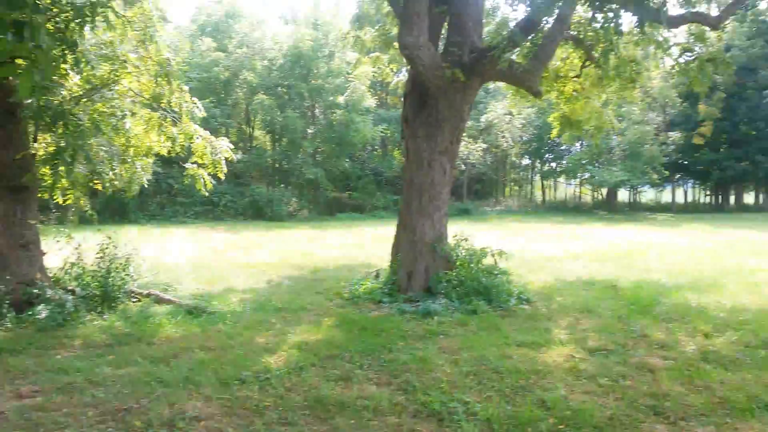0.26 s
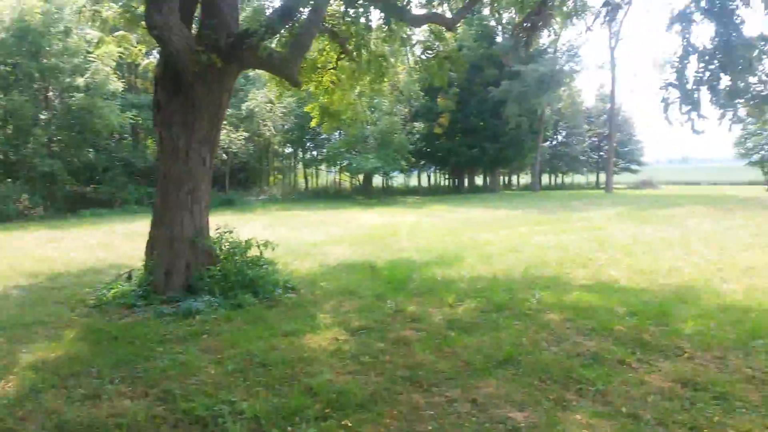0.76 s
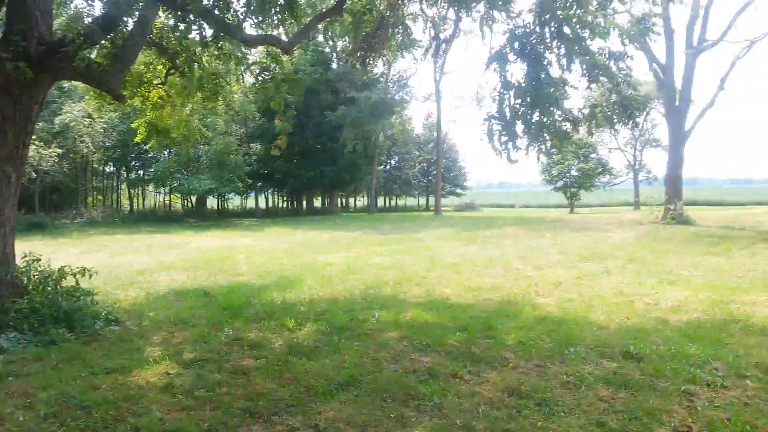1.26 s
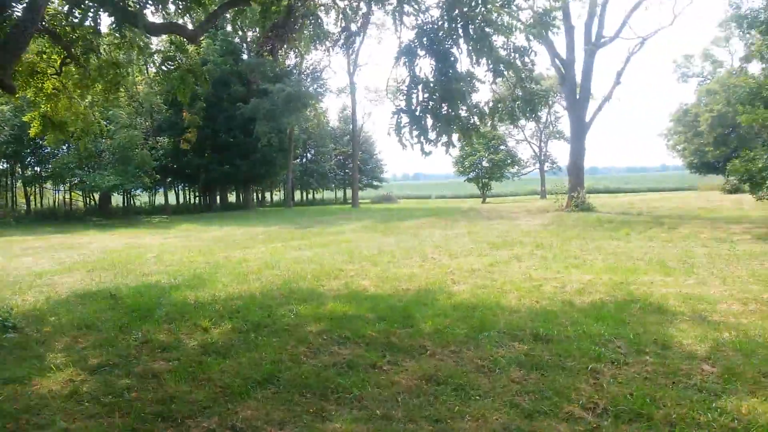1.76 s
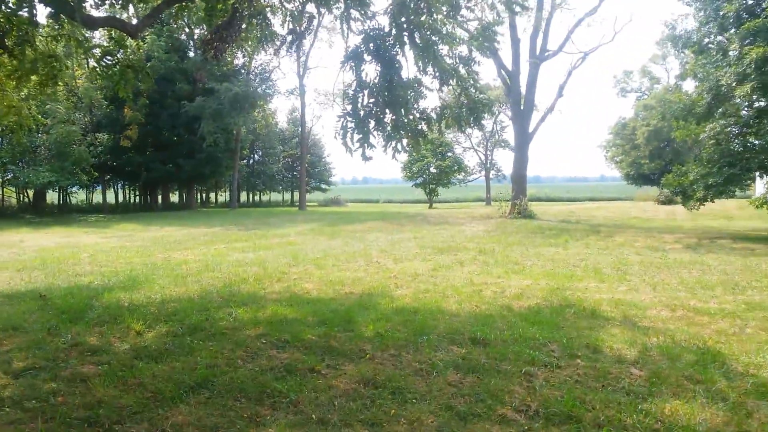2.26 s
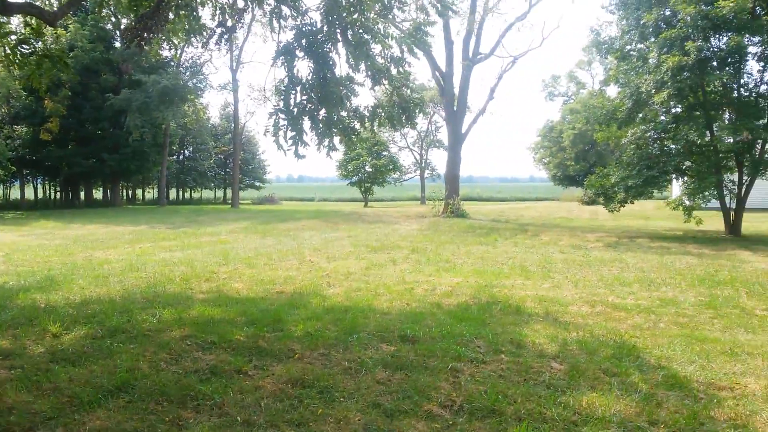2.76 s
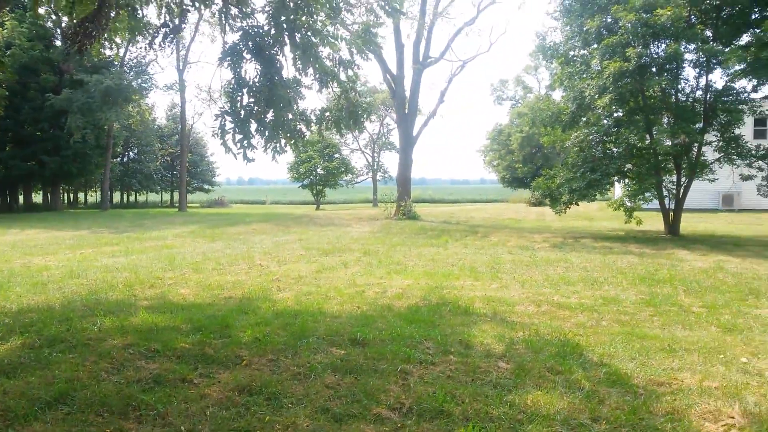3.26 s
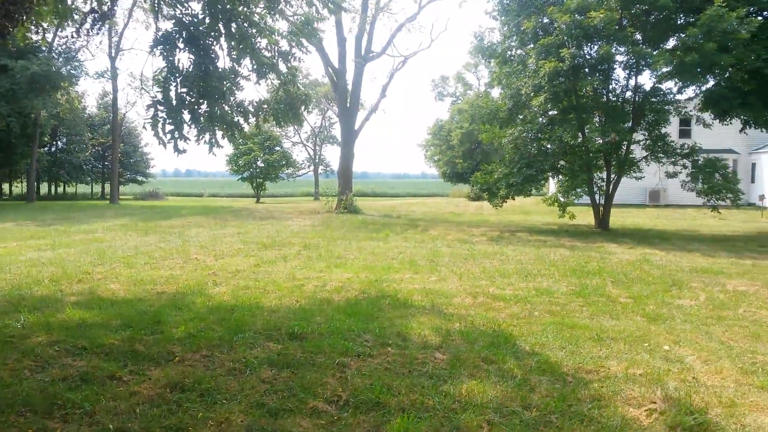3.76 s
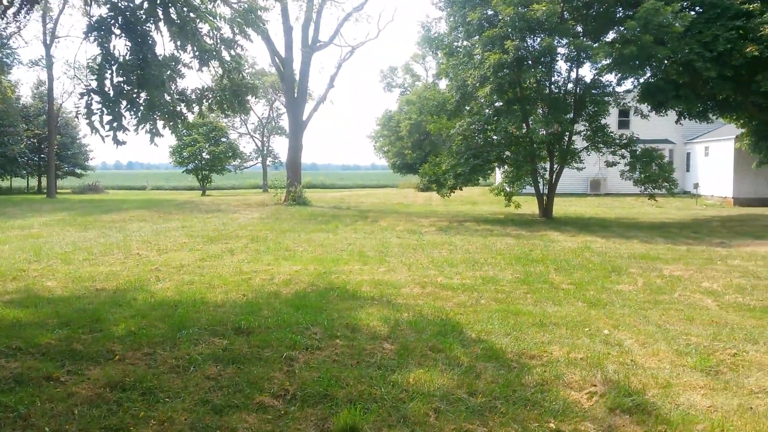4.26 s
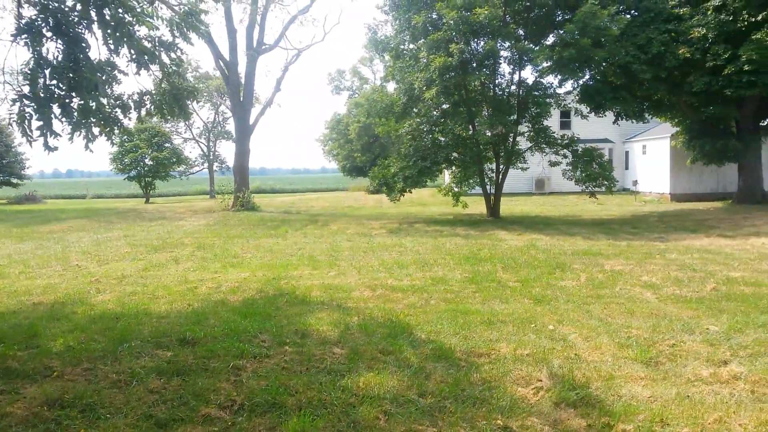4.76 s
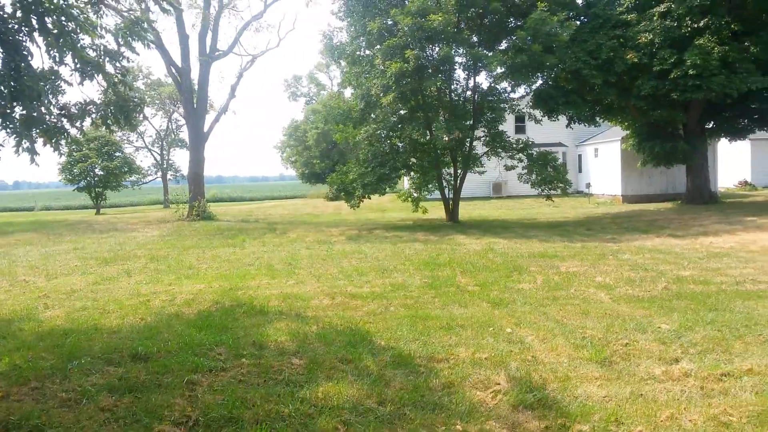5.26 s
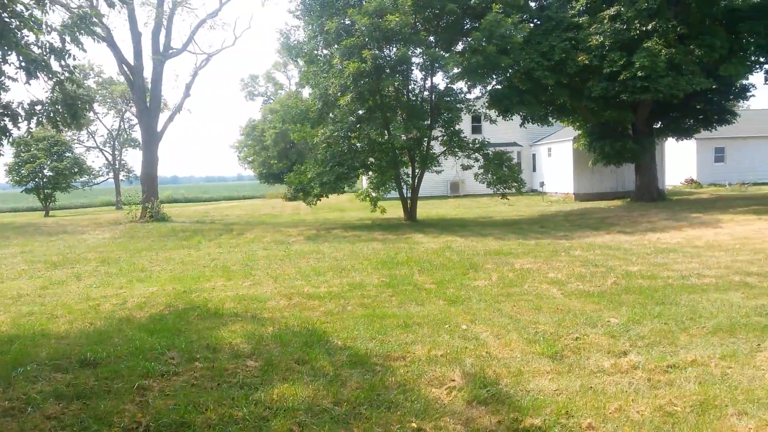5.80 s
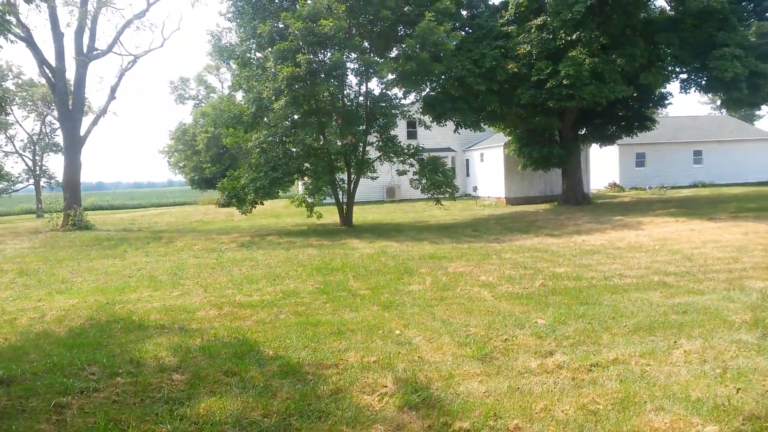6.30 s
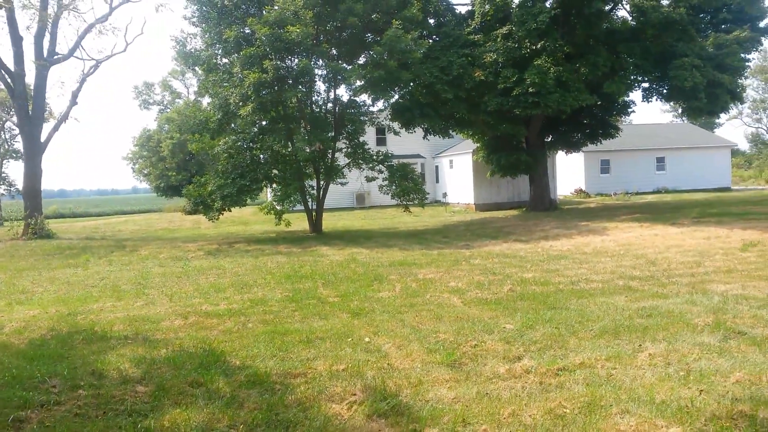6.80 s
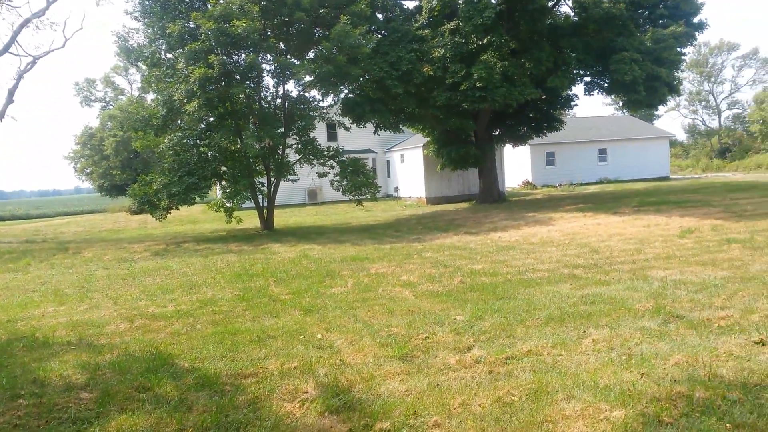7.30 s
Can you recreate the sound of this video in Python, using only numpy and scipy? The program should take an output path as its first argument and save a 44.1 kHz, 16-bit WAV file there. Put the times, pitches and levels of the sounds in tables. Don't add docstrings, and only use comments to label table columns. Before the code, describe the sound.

Insects trill shrilly and steadily among trees, with lower cricket chirps, katydid ticks, buffeting wind that calms, and a few thin bird whistles late.

```python
import sys
import numpy as np
from scipy import signal
from scipy.fft import rfft, irfft, next_fast_len
from scipy.io import wavfile
from scipy.ndimage import uniform_filter1d

SR = 44100
rng = np.random.default_rng(int(sys.argv[2]) if len(sys.argv) > 2 else 0)


def magnitude_from_level(level_db):
    exponent = np.asarray(level_db, float) / 20
    return 10 ** exponent


def transcribe(signal):
    frames = np.atleast_2d(signal).T
    limited = np.clip(frames, -1, 1)
    pcm = np.round(limited * 32767).astype(np.int16)
    wavfile.write(sys.argv[1], SR, pcm)


N = 332514
T = np.arange(N) / SR
COARSE_T = T[::8]
MID_HZ = 8200

# pitch in Hz, left and right level in dB.
AIR = [(91, -9.5, -9.5), (417, -22, -22), (990, -21, -21.5), (2100, -21.5, -22), (2860, -23, -27),
       (4025, -23, -25), (4750, -14.5, -17.5), (5190, -19, -14), (5270, -16, -32), (6160, -23.5, -15),
       (6880, -10.5, -20.5), (9300, -20.5, -22.5), (12200, -23, -18.5), (14330, -19, -15),
       (16100, -17, -13)]
# pitch in Hz, left level in dB, right level in dB.
LEAVES = [(300, 4.5, 0), (1010, -11, -12), (2200, -9, -11), (2900, -18, -30), (3500, -7, -24),
          (4300, -9, -27), (5100, -3, -13), (6000, -11, -13), (9900, -28, -10), (14500, -20, -7)]
# time in seconds, level in dB.
RUSTLE = [(0, -46), (.3, -41.5), (.44, -37), (.5, -37), (.72, -36), (.85, -37), (.9, -41), (1.1, -49),
          (1.35, -58), (1.5, -41), (2.4, -45.5), (2.9, -53), (3.6, -74.5), (7.54, -50.5)]
# time in seconds, pitch in Hz, level in dB.
HUM = [
    (0, 155.6, -83),
    (2.8, 156.5, -60),
    (3.9, 157.4, -63.5),
    (4.6, 156, -62),
    (4.75, 158.2, -50),
    (5.2, 156.4, -51),
    (5.9, 155.3, -54.5),
    (6.4, 154.7, -61),
    (7.54, 154, -63),
]
# start in seconds, length in seconds, start pitch in Hz, end pitch in Hz, level in dB.
BIRD = [
    (5.682, .075, 9950, 9150, -42),
    (5.81, .065, 10150, 9250, -43),
    (5.922, .058, 10000, 9350, -39),
    (6.035, .06, 10050, 9200, -41),
    (7.125, .07, 11620, 11130, -51),
    (7.2, .24, 11100, 10470, -48),
]
# time in seconds, peak level in dB, left minus right in dB.
CHIRPS = [(0.1431, -56, -5), (0.1815, -64, -3), (1.2784, -50, -3), (1.3134, -50, 7), (1.5314, -58, 1),
          (1.5728, -47, 2.0), (1.7664, -47, 1.0), (1.8053, -50, 3.0), (2.0183, -48, 6.0),
          (2.0557, -45, 5.0), (2.0887, -44, -4), (2.2224, -43, -1.0), (2.2643, -45, -4), (2.5446, -42, -6),
          (2.579, -41, -2.0), (2.7187, -50, -2), (2.7644, -44, 4.0), (2.798, -43, 3.0),
          (2.8345, -40.5, 0.5), (3.0584, -44, 3.5), (3.0914, -42, 3), (3.1244, -51, 1.5), (3.1707, -50, 3),
          (3.1944, -53, 5.0), (4.0537, -49, 1.5), (4.0996, -51, 2.5), (4.4593, -46, -2), (4.5027, -47, -3),
          (5.4715, -45, 1.5), (5.5967, -41, 0.5), (5.6331, -39.5, 1.0), (5.8616, -42.5, -1),
          (5.894, -42, 0.5), (6.134, -42, 3.0), (6.1664, -41, -6), (6.4657, -47, 6), (6.4961, -48, 0.5),
          (6.8434, -50, 2), (6.8902, -45, 1), (7.1367, -52, 6), (7.1726, -51, 0)]
# time in seconds, peak level in dB, left minus right in dB.
FAR_CHIRPS = [
    (5.405, -50, 2),
    (5.57, -48, 0),
    (5.83, -48, 0),
    (6.1, -53, 0),
    (6.21, -53, 2),
]
# start in seconds, end in seconds, strokes per second, left and right level in dB.
BUZZES = [
    (1.36, 2.9, 170, -55, -48),
    (4.0, 4.75, 56.5, -55, -56),
    (.42, .85, 170, -50, -47),
]
# time in seconds, peak level in dB, left minus right in dB.
TICKS = [(.454, -31, -3), (.468, -31, -3), (.473, -29, -6), (.479, -28, -4), (.493, -25, -3),
         (.503, -28, -3), (.51, -29, -3), (.572, -27, -4), (.705, -29, -5), (.527, -27, 0), (.55, -30, -4),
         (.607, -20, -5), (.672, -30, -6), (.693, -25, -4), (.712, -27, -4), (3.856, -38, 3),
         (3.92, -37, 3), (3.985, -38, 3), (5.889, -38, 0)]
# time in seconds, peak level in dB, centre pitch in Hz, left minus right in dB, top pitch in Hz.
CLICKS = [(0.33, -32, 1890, 2, 6040), (0.4156, -43, 1020, 20, 4000), (0.4217, -28.5, 1650, 17.5, 3470),
          (0.455, -49, 1110, -2, 6000), (0.6626, -26, 2740, 5, 3500), (0.6809, -13.5, 2100, 1, 7940),
          (0.7342, -26.5, 2140, -10, 3500), (1.334, -40, 1560, 8, 4000), (1.394, -19.5, 1530, 4, 3800),
          (4.0172, -38, 1740, 17, 5000), (4.0255, -28, 2020, 1, 3200), (4.0551, -33, 1230, 16, 2800),
          (5.3286, -39.5, 3640, -4.5, 5000)]
# time in seconds, left level in dB, right level in dB.
BREEZE = [
    (0, -22, -25.5),
    (.8, -35, -31.5),
    (1.1, -78, -39),
    (2.3, -45, -43.5),
    (2.7, -49, -65),
    (4.5, -46, -47),
    (6, -60, -53),
    (7.54, -61, -70),
]
# middle in seconds, length in seconds, left level in dB, right level in dB.
GUSTS = [(0.03, 0.26, -23.5, -41), (0.192, 0.11, -20, -22.5), (0.493, 0.12, -15.5, -11.5),
         (0.864, 0.2, -37, -22.5), (1.277, 0.25, -47, -22), (1.51, 0.17, -58, -27.5),
         (1.797, 0.17, -55, -29.5), (2.152, 0.3, -66, -31.5), (2.33, 0.17, -40, -30),
         (2.73, 0.15, -51, -38), (3.138, 0.086, -42, -33.5), (3.378, 0.12, -47, -28.5),
         (3.534, 0.16, -35, -32), (3.903, 0.31, -62, -40), (4.28, 0.06, -40.5, -32.5),
         (4.52, 0.13, -33, -41), (4.935, 0.23, -58, -40.5), (5.313, 0.48, -60, -43.5),
         (5.78, 0.1, -68.5, -42.5), (6.346, 0.26, -48.5, -50), (6.784, 0.21, -49, -51),
         (7.428, 0.13, -66, -46)]
# pitch in Hz, level in dB.
BUFFET = [(20, 2), (45, -7), (80, 12), (130, 9), (220, -1.5), (350, -17), (550, -30), (1200, -38)]
# time in seconds, level in dB, pitch in Hz.
EDDIES_LEFT = [(.202, -16.5, 185), (.231, -12.5, 224), (.464, -17, 203), (.548, -15, 161), (.605, -22, 122),
               (.784, -16.5, 200), (.83, -9, 175), (1.085, -34, 127), (1.212, -18.5, 139),
               (2.051, -25, 120), (2.325, -40, 110), (2.897, -37, 101), (3.343, -35, 189),
               (3.523, -20.5, 201), (3.559, -41, 90.5), (3.631, -26.5, 130), (3.702, -34.5, 99),
               (3.948, -23, 107), (4.223, -36, 109), (4.286, -24, 112), (4.519, -30, 116),
               (4.566, -37, 105), (4.836, -39, 122), (5.15, -47, 117), (5.498, -27.5, 184),
               (5.701, -40, 116), (6.18, -38.5, 93), (6.395, -42, 142), (6.869, -33.5, 114),
               (7.45, -37.5, 112.1)]
# time in seconds, level in dB, pitch in Hz.
EDDIES_RIGHT = [(0.279, -13.5, 178), (0.511, -9.5, 273), (0.542, -11.5, 162), (0.859, -14, 166),
                (1.008, -15.5, 157), (1.139, -15.5, 116), (1.189, -9.5, 153), (1.243, -12, 132),
                (1.302, -14.5, 143), (1.452, -17, 154), (1.604, -13, 147), (1.782, -13, 165),
                (1.855, -15, 156), (2.073, -11.5, 164), (2.113, -13.5, 174), (2.186, -15, 126),
                (2.347, -18, 188), (2.712, -27, 107), (2.93, -26, 110), (3.089, -28, 142),
                (3.175, -22, 159), (3.376, -19.5, 130), (3.457, -22, 126), (4.488, -25, 154),
                (4.949, -20, 165), (5.195, -21, 142), (5.743, -36, 95.5), (5.986, -40, 113),
                (6.14, -34.5, 132), (6.754, -36.5, 113)]
# pitch in Hz, left level in dB, right level in dB.
SINGERS = [(6550, -34, -28), (7000, -13.5, -18.5), (7393, -2, -5), (7540, -4.5, -2), (7940, -5, 1.5),
           (8640, -9, -1.5), (8980, -13.5, -8.5), (8920, -26, -24), (9550, -24, -24)]
# time in seconds, level in dB, left minus right in dB.
CHORUS = [(0.0, -33.5, 0.5), (1.11, -33, -1.5), (1.19, -35, -2), (3.0, -34, -1), (4.09, -33.5, 0),
          (5.63, -31.5, 0), (7.54, -33.5, -0.5)]
# start in seconds, end in seconds, pitch in Hz, pulses per second, time of one pulse in seconds.
NEAR = [
    (-.3, 1.9, 8830, 17.74, .022),
    (-.3, 1.9, 8700, 18.6, .024),
    (1.8, 3.8, 8950, 17.86, 1.908),
    (1.9, 3.9, 9190, 19.45, 1.93),
    (3.7, 5.8, 8930, 17.99, 3.854),
    (3.8, 5.7, 9140, 18.2, 3.803),
    (5.8, 7.9, 8720, 17.86, 6.172),
    (5.8, 7.9, 8850, 17.43, 6.17),
    (5.9, 7.9, 9220, 19.27, 6.186),
]
# left level in dB, right level in dB.
NEAR_DB = [(-48, -37), (-41, -46), (-40.5, -50), (-54, -42), (-40.5, -41), (-49, -46), (-38, -48),
           (-48, -37.5), (-52, -46)]


def evened(x):
    return x / np.sqrt(np.mean(abs(x) ** 2) + 1e-20)


def columns(rows, at):
    key, *values = np.transpose(rows)
    return np.array([np.interp(at, key, v) for v in values])


def sides(pan_db):
    return magnitude_from_level(np.array([.5, -.5])[:, None] * pan_db)


def add(mix, s, sound):
    part = mix[:, max(round(s * SR), 0):][:, :sound.shape[1]]
    part += sound[:, :part.shape[1]]


def coloured(x, shape):
    size = next_fast_len(N)
    hz = np.fft.rfftfreq(size, 1 / SR)
    table = np.array(shape, float)
    table[:, 0] = np.log(table[:, 0])
    return irfft(rfft(x, size) * magnitude_from_level(columns(table, np.log(hz + 1))))[:, :N]


def drift(span_s, count):
    coarse = rng.standard_normal((count, N // 64 + 2))
    for _ in range(2):
        coarse = uniform_filter1d(coarse, max(int(span_s * SR / 64), 1), axis=1)
    return np.array([np.interp(np.arange(N) / 64, np.arange(len(c)), evened(c)) for c in coarse])


def partly_alike(same=.3):
    left, other = rng.standard_normal((2, N))
    return np.array([left, same * left + other])


def far_air():
    swell_db = .6 * drift(.3, count=2)
    return evened(coloured(partly_alike(), AIR)) * magnitude_from_level(-44.5 + swell_db)


def leaves():
    grain = magnitude_from_level(2.2 * drift(.004, count=1))
    return evened(coloured(partly_alike() * grain, LEAVES)) * magnitude_from_level(columns(RUSTLE, T))


def machine_hum():
    hz, db = columns(HUM, T)
    level = np.sqrt(2) * magnitude_from_level(db + 0.34 * drift(0.021, count=1))
    return level * np.sin(2 * np.pi * np.cumsum(hz) / SR)


def bird(mix, warble_hz=45, warble=0.0055):
    shadow_db = np.array([[-18], [0]])
    for s, length, start_hz, end_hz, db in BIRD:
        u = np.arange(0, 1, 1 / (length * SR))
        hz = start_hz + (end_hz - start_hz) * (abs(u - .2) / .8) ** 1.5
        hz = hz * (1 + warble * np.sin(2 * np.pi * warble_hz * u * length))
        hz = hz * (1 + .011 * evened(uniform_filter1d(rng.standard_normal(len(u)), size=60)))
        swell = signal.windows.tukey(len(u), .5) * (1 - .5 * u)
        note = np.sin(2 * np.pi * np.cumsum(hz) / SR) * swell
        add(mix, s, magnitude_from_level(db + 3 + shadow_db) * note)


def field_cricket(mix, rows, top_hz, fall_hz, waver, length_s=0.023, fade_db=-9):
    u = np.arange(0, 1, 1 / (length_s * SR))
    husks = uniform_filter1d(rng.standard_normal((len(rows), len(u))), size=90)
    for (s, db, pan), husk in zip(rows, husks):
        hz = (top_hz - fall_hz * u ** 2.7) * (1 + waver * evened(husk))
        swell = np.sin(np.pi * u) ** .7 * magnitude_from_level(fade_db * u ** 2)
        stroke = swell * np.sin(2 * np.pi * np.cumsum(hz) / SR)
        add(mix, s - .004, magnitude_from_level(db + 2) * sides(np.clip(pan, -6, 8)) * stroke)


def katydid_buzzes(mix, rasp_hz=11800, width_hz=1900, clear_per_s=52):
    for start, end, rate, *db in BUZZES:
        t = np.arange(0, end - start, 1 / SR)
        gap_depth = np.clip(clear_per_s / rate, 0, 1)
        strokes = 1 - gap_depth * (rate * t % 1 > .45)
        edges_hz = [rasp_hz - width_hz * rate / 170, rasp_hz + width_hz]
        band = signal.butter(2, edges_hz, "bandpass", fs=SR)
        rasp = evened(signal.lfilter(*band, strokes * rng.standard_normal((2, len(t)))))
        fade = np.clip(np.minimum(t / .12, (t[-1] - t) / .25), 0, 1)
        add(mix, start, magnitude_from_level(np.array(db))[:, None] * rasp * fade)


def katydid_ticks(mix):
    t = T[:200]
    front = (t == t[3]) * 2.2
    noise = rng.standard_normal((len(TICKS), 2, 200)) * magnitude_from_level(-6) + front
    for (s, db, pan), rasp in zip(TICKS, noise):
        rasp = signal.lfilter(*signal.butter(2, 6000, "high", fs=SR), rasp)
        add(mix, s, magnitude_from_level(db + 4.5 - 60 * t / .008) * sides(pan) * rasp)


def housing_clicks(mix, turns=1.1, sag=.7, sag_s=.0005):
    t = T[:400]
    ticks = rng.standard_normal((len(CLICKS), 2, 400))
    for (s, db, hz, pan, top_hz), tick in zip(CLICKS, ticks):
        tick = signal.lfilter(*signal.butter(3, top_hz, fs=SR), tick)
        cycles = np.cumsum(hz * (1 - sag / 3 + sag * np.exp(-t / sag_s))) / SR
        swing = np.sin(2 * np.pi * cycles) * np.exp(-cycles / turns) * np.minimum(t / 0.0003, 1)
        swing += 0.5 * np.sin(2 * np.pi * 850 * t) * magnitude_from_level(-60 * t / 0.0092)
        click = swing + 2.05 * tick * magnitude_from_level(-60 * t / 0.0041)
        add(mix, s, magnitude_from_level(db + 1) * sides(pan) * click)


def wind_level():
    t = T[::64]
    power = magnitude_from_level(2 * columns(BREEZE, t))
    for s, length, *db in GUSTS:
        power = power + magnitude_from_level(2 * np.array(db))[:, None] * np.exp(-(2 * (t - s) / length) ** 2)
    return np.array([np.interp(T, t, 10 * np.log10(p)) for p in power])


def small_eddies(level_db, count=50, over_db=7.5, spread_db=-1.5, calm_hz=105, hz_per_db=9):
    draw = rng.random((count, 3))
    s = (np.arange(count) + draw[:, 0]) / count * T[-1]
    db = np.interp(s, T, level_db) + over_db + spread_db * (draw[:, 1] - .5)
    hz = (calm_hz + hz_per_db * np.maximum(db + 36, 0)) * (0.52 + 0.57 * draw[:, 2])
    return list(zip(s, db, hz))


def wind_rumble(gust_db, lumps_db=4.5, faster=1.426):
    lumpy = rng.standard_normal((2, 2, N)) * magnitude_from_level(lumps_db * drift(.012, count=2))
    speed = np.clip((gust_db + 33.5) / 22, 0, 1)
    slow = evened(coloured(lumpy[0], BUFFET))
    fast = evened(coloured(lumpy[1], [(hz * faster, db) for hz, db in BUFFET]))
    return (np.sqrt(1 - speed) * slow + np.sqrt(speed) * fast) * magnitude_from_level(gust_db - 2.5)


def wind(turns=0.47, snap=0.63):
    gust_db = wind_level()
    out = wind_rumble(gust_db)
    t = T[:3000] - T[1500]
    for port, strong in enumerate((EDDIES_LEFT, EDDIES_RIGHT)):
        eddies = [*strong, *small_eddies(gust_db[port])]
        phases = rng.random((len(eddies), 1))
        for (s, db, hz), phase in zip(eddies, phases):
            width = t * hz / turns
            thump = np.cos(2 * np.pi * (hz * t + phase)) * np.exp(-width ** 2 / 2)
            thump += snap * np.cos(2 * np.pi * (1.46 * hz * t + phase)) * np.exp(-(2 * width) ** 2 / 2)
            add(out[port:port + 1], s - T[1500], magnitude_from_level(db) * thump[None])
    return out


def pulses(hz, swell):
    return swell * np.exp(2j * np.pi * np.cumsum(hz - MID_HZ, axis=1) * 8 / SR)


def lifted(x):
    fine = signal.resample_poly(x, up=8, down=1, axis=1)[:, :N]
    return (fine * np.exp(2j * np.pi * MID_HZ * T)).real


def scattered(x, tail):
    return signal.fftconvolve(x, tail, axes=1)[:, :len(COARSE_T)]


def cricket_crowd(count=70, duty=.46, slur=.05, unsteady=.02):
    draw = rng.random((count, 6))
    pitch = 6950 + 2400 * (np.arange(count) + draw[:, 0]) / count
    level = magnitude_from_level(columns(SINGERS, pitch) + 5 * (draw[:, 1:3].T - .5))
    rate = (15 + 7 * draw[:, 5])[:, None]
    start = (draw[:, 3] + draw[:, 1])[:, None]
    turns = rate * COARSE_T + start
    stroke = np.minimum(turns % 1 / duty, 1)
    luck = np.take_along_axis(rng.random((count, 200)), turns.astype(int), axis=1)
    wander = unsteady * np.sin(2 * np.pi * (.05 * rate * COARSE_T + 7 * start))
    hz = pitch[:, None] * (1 + wander + .032 * (luck - .5) + slur * (.3 - stroke ** 2))
    swell = magnitude_from_level(6.8 * (luck * 7 % 1 - 3)) * np.sin(np.pi * stroke)
    paths = np.exp(2j * np.pi * draw[:, 3:5].T)
    return evened((level * paths) @ pulses(hz, swell))


def near_crickets(duty=.5, slur=.022, uneven_db=7, fade_s=.25):
    start, end, pitch, rate, pulse = np.array(NEAR).T[:, :, None]
    turns = rate * (COARSE_T - pulse) + duty / 2 + 150
    singer = np.arange(len(NEAR))[:, None] % 3
    luck = rng.random((3, 200))[singer, turns.astype(int) % 200]
    stroke = np.minimum(turns % 1 / duty, 1)
    hz = pitch * (1 + .012 * (luck - .5) + slur * (.3 - stroke ** 2))
    bout = np.clip(np.minimum(COARSE_T - start, end - COARSE_T) / fade_s, 0, 1)
    swell = bout * magnitude_from_level(uneven_db * (luck * 7 % 1 - .5)) * np.sin(np.pi * stroke)
    return magnitude_from_level(np.transpose(NEAR_DB)) @ pulses(hz, swell)


def cricket_chorus(far_db=-2, scatter_s=0.093, wet_db=-9):
    fade = magnitude_from_level(-60 * COARSE_T[:1200] / scatter_s / 3)
    tail = rng.standard_normal((2, 1200, 2)) @ [1, 1j] * fade
    crowd = cricket_crowd()
    crowd = evened(lifted(crowd + magnitude_from_level(wet_db) * evened(scattered(crowd, tail))))
    far_shape = [(6030, -76, -49), *SINGERS, (10300, -62, -72)]
    far = evened(coloured(rng.standard_normal((2, N)), far_shape))
    level_db, pan_db = columns(CHORUS, T)
    trill = magnitude_from_level(level_db + 1.5) * sides(pan_db) * evened(crowd + magnitude_from_level(far_db) * far)
    near = near_crickets()
    short_tail = tail[:, :300] / np.linalg.norm(tail[0, :300])
    return trill + lifted(near + .5 * scattered(near, short_tail))


def scene(echo_db=-6.5, echo_s=.15):
    calls = np.zeros((2, N))
    bird(calls)
    field_cricket(calls, FAR_CHIRPS, 5080, 400, .015)
    field_cricket(calls, CHIRPS, 5370, 800, .007)
    tail = rng.standard_normal((2, 6000)) * magnitude_from_level(-60 * T[:6000] / echo_s)
    tail = tail / np.linalg.norm(tail[0])
    echo = magnitude_from_level(echo_db) * signal.fftconvolve(calls, tail, axes=1)[:, :N]
    mix = far_air() + leaves() + machine_hum() + calls + echo
    katydid_buzzes(mix)
    katydid_ticks(mix)
    housing_clicks(mix)
    return mix + wind() + cricket_chorus()


def top_cut(x):
    return signal.sosfilt(signal.butter(12, 15900, fs=SR, output="sos"), x)


def record(dry):
    cut = signal.lfilter(*signal.butter(2, 42, "high", fs=SR), dry)
    soft = np.tanh(cut / 0.8) * 0.95
    return top_cut(soft)


dry = scene()
out = record(dry)
transcribe(out)
```